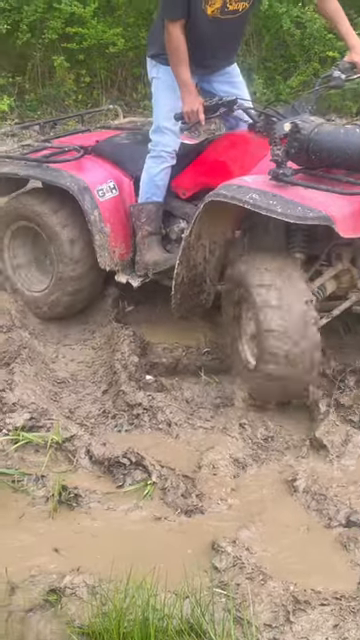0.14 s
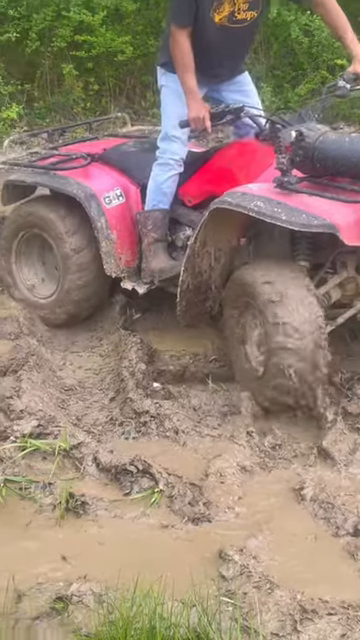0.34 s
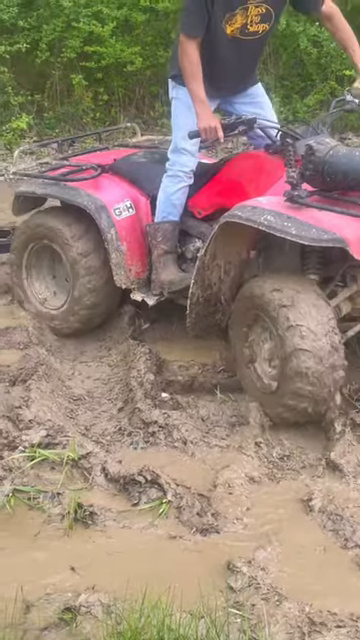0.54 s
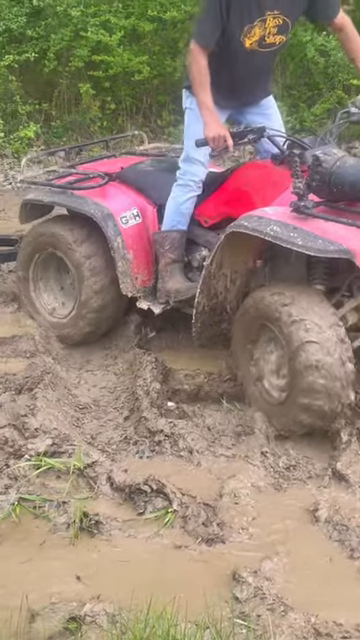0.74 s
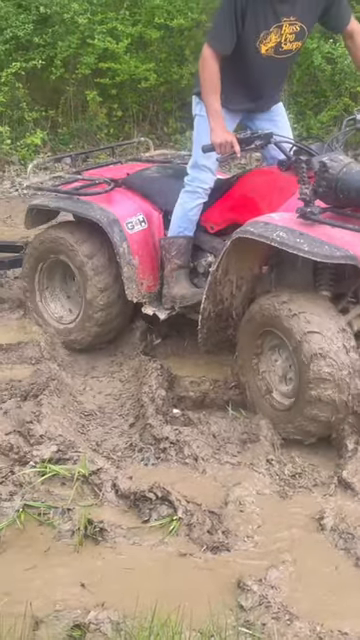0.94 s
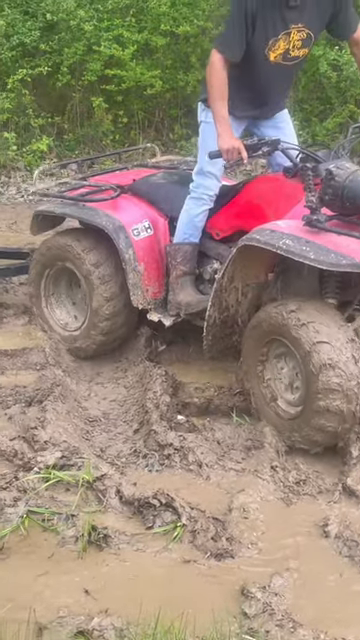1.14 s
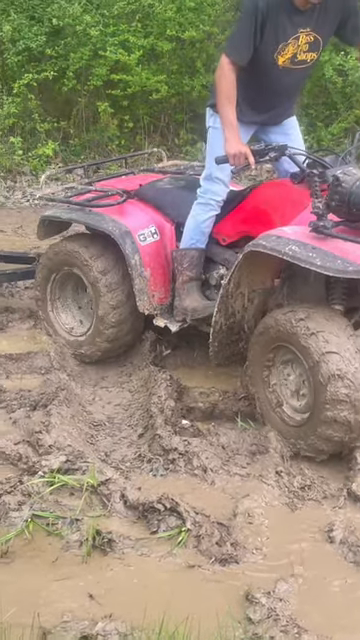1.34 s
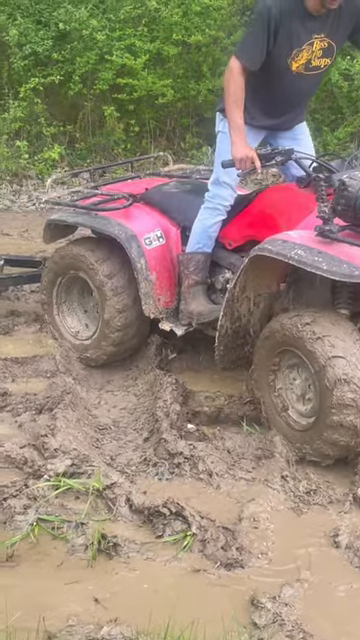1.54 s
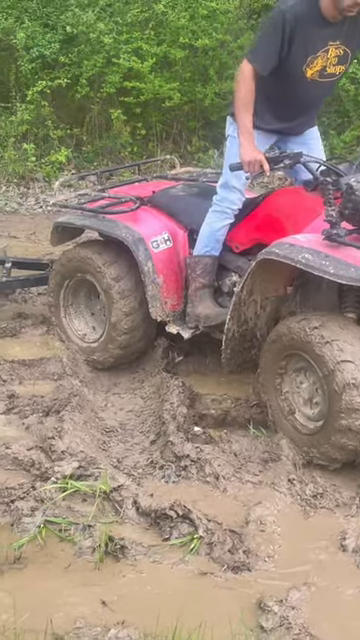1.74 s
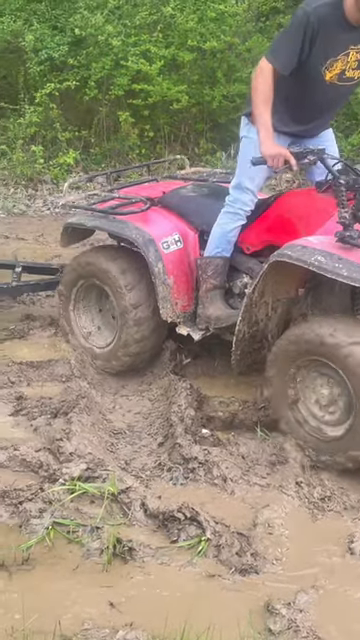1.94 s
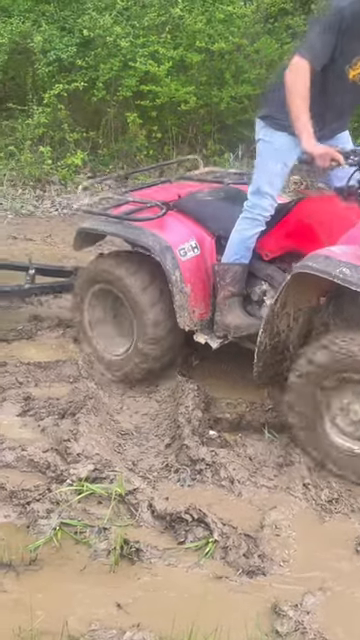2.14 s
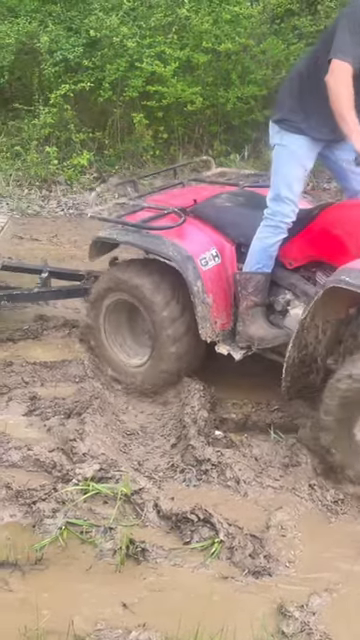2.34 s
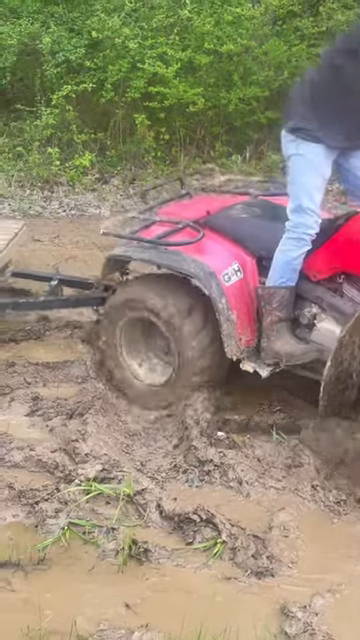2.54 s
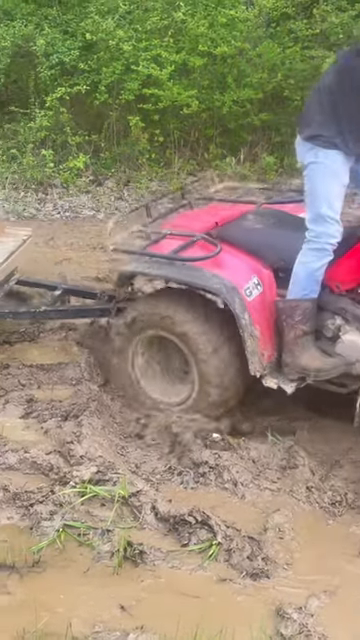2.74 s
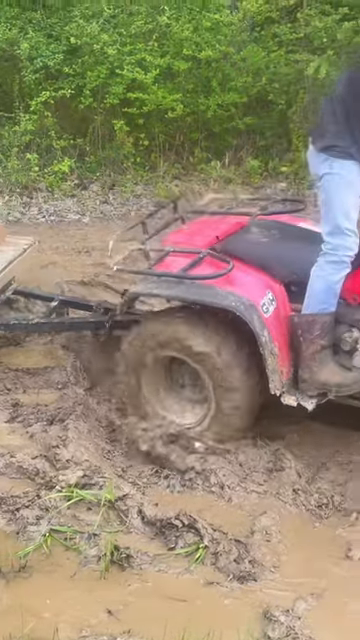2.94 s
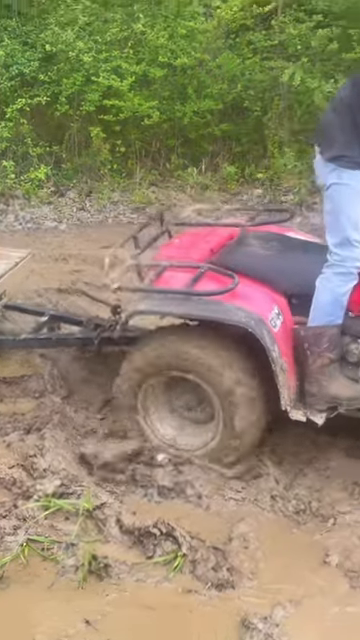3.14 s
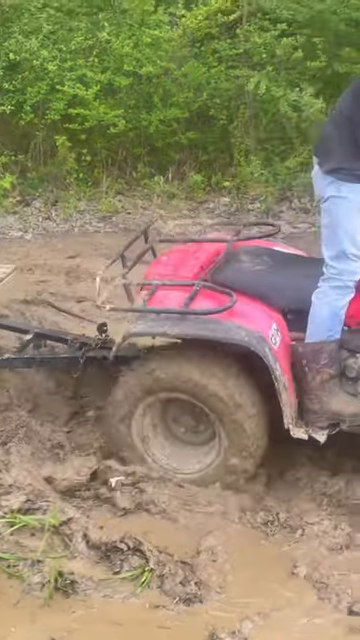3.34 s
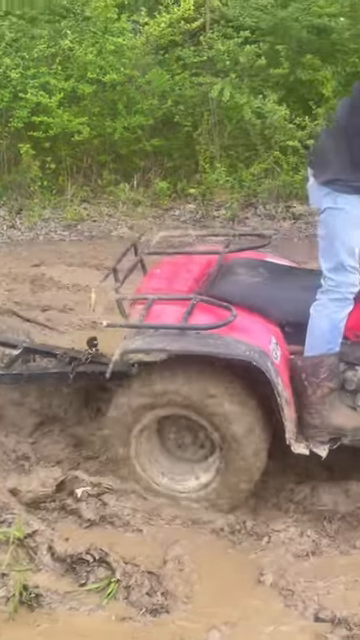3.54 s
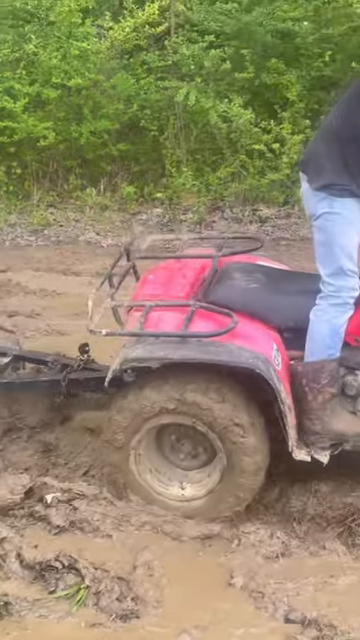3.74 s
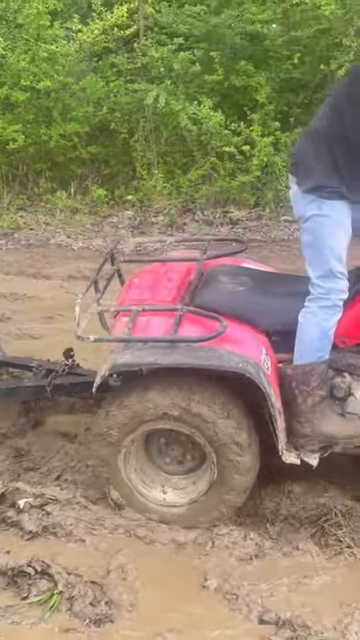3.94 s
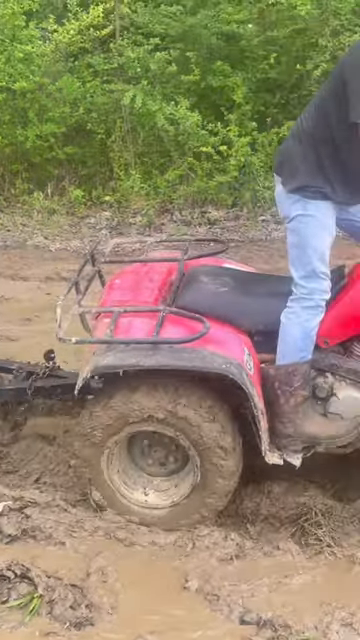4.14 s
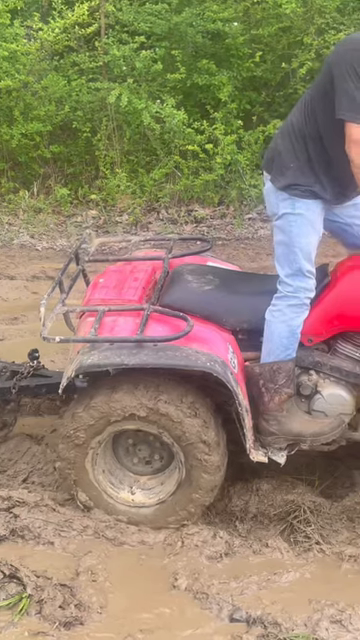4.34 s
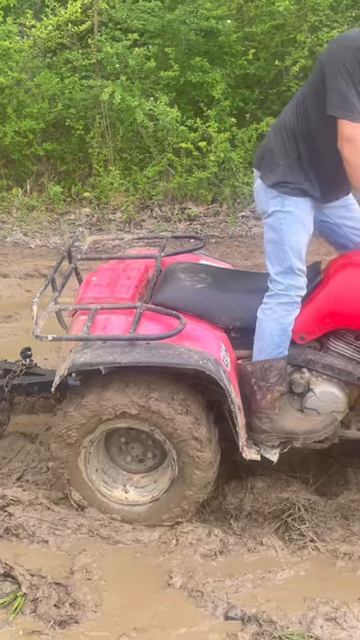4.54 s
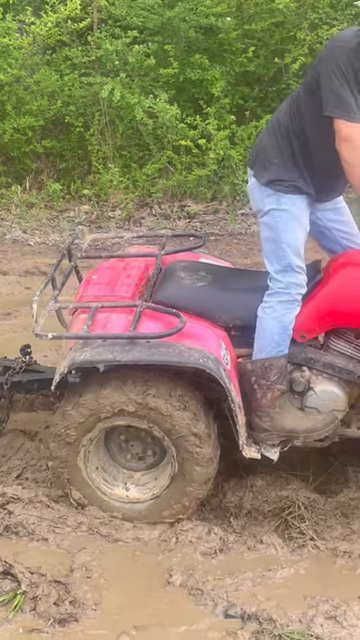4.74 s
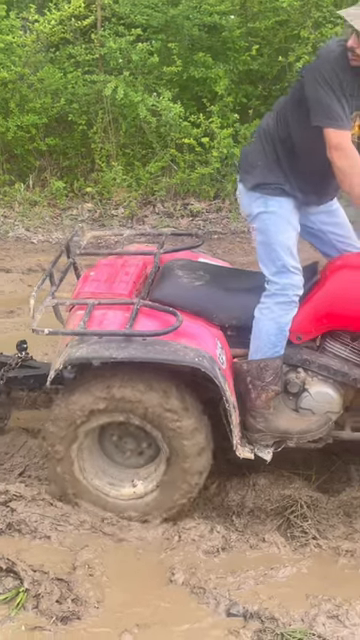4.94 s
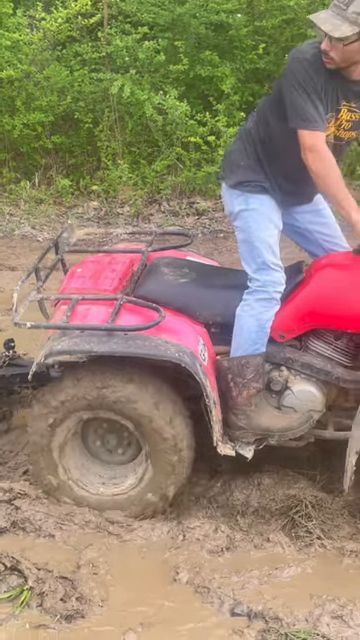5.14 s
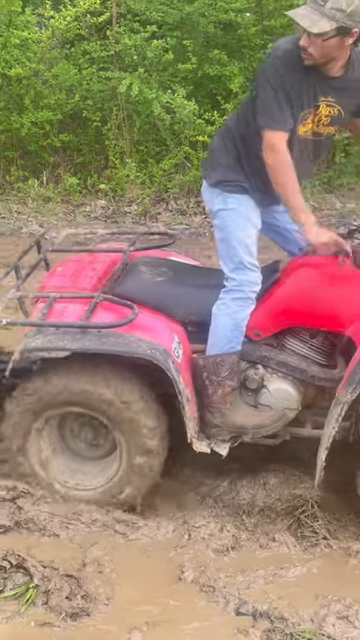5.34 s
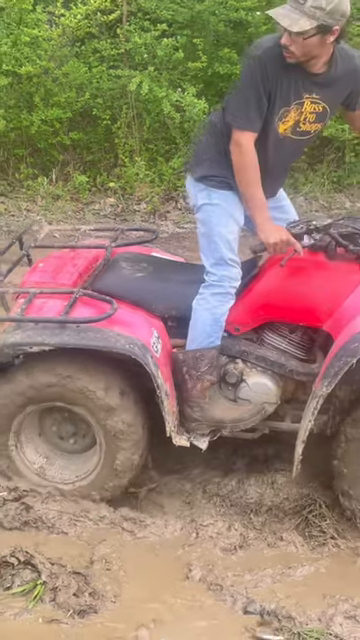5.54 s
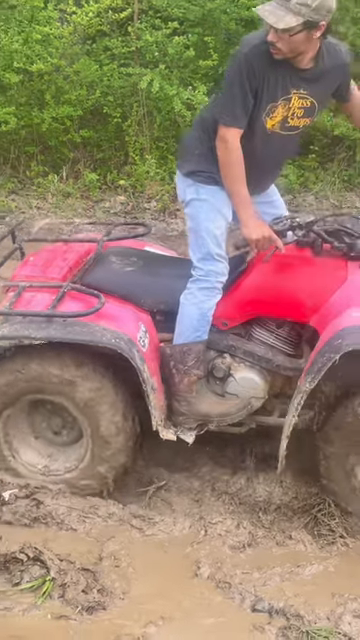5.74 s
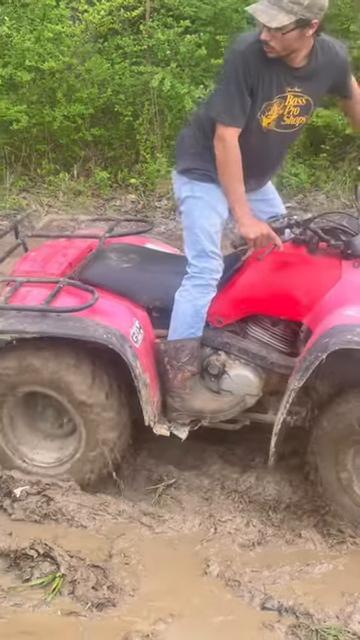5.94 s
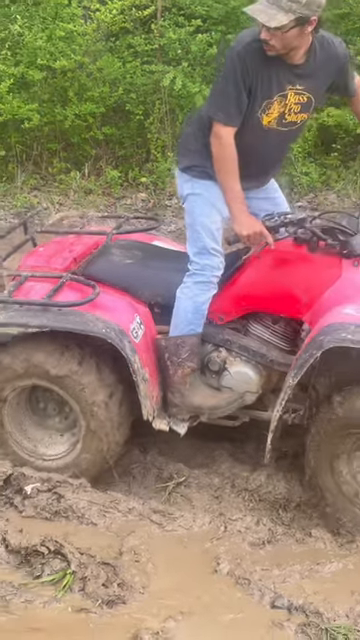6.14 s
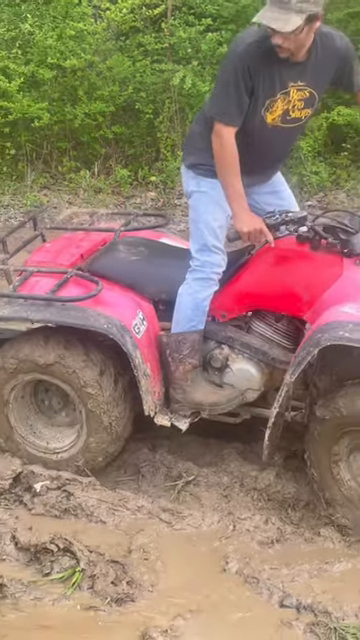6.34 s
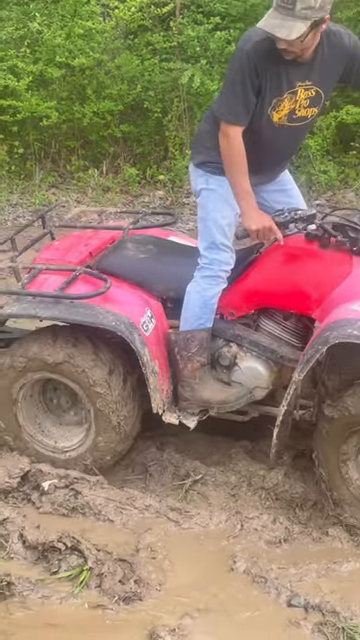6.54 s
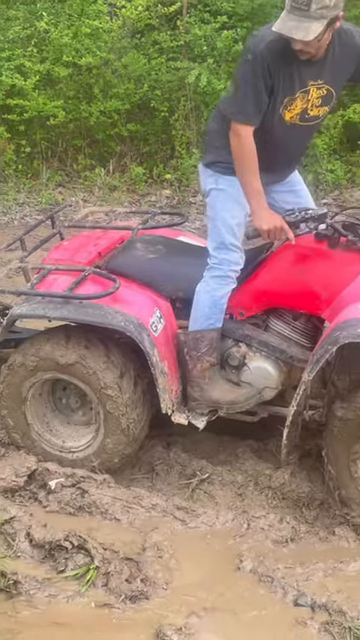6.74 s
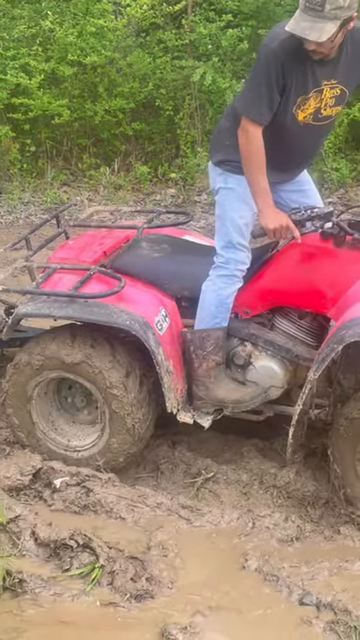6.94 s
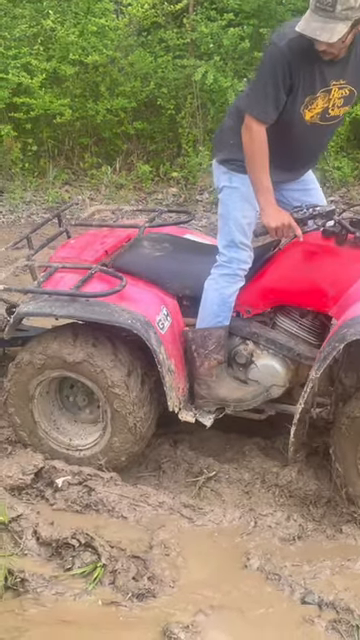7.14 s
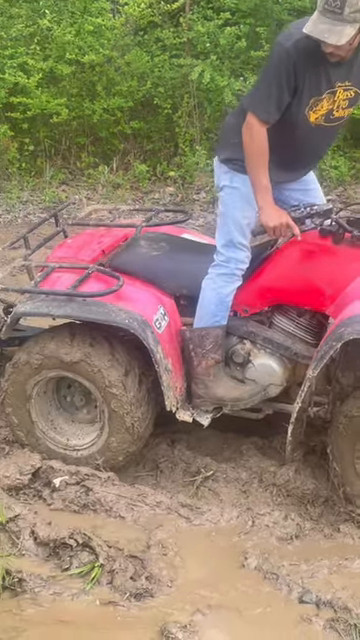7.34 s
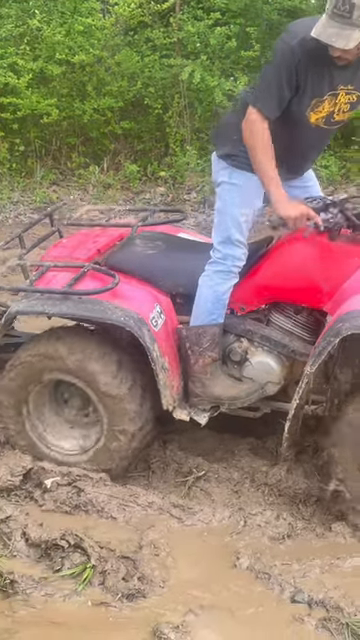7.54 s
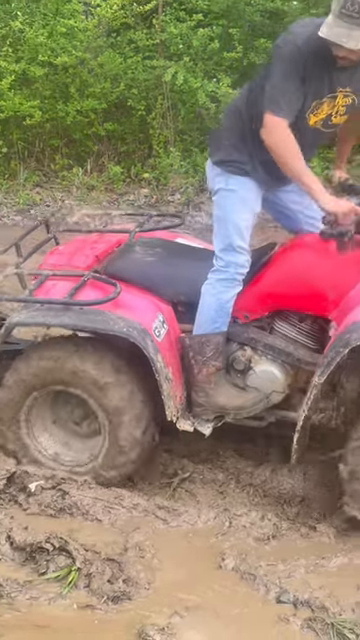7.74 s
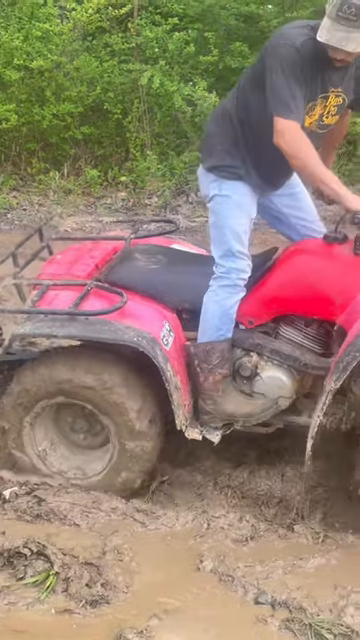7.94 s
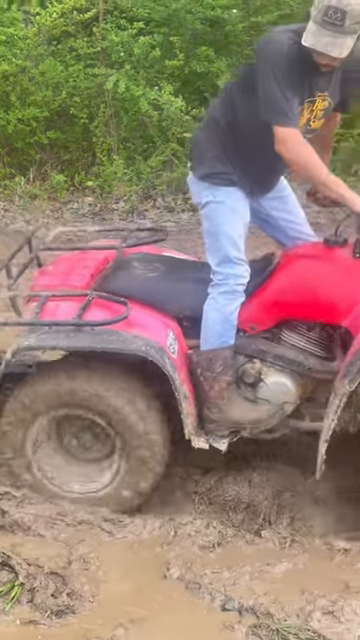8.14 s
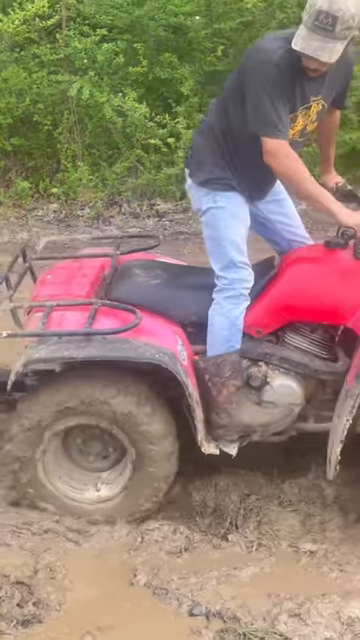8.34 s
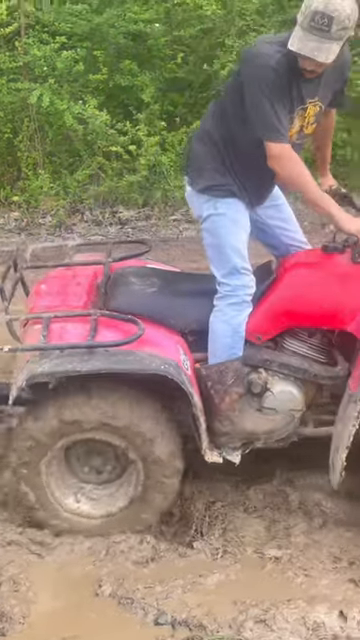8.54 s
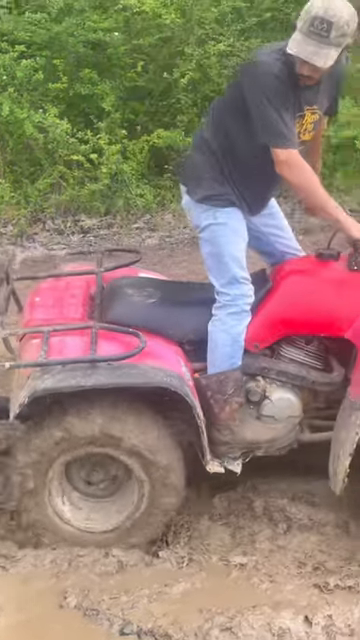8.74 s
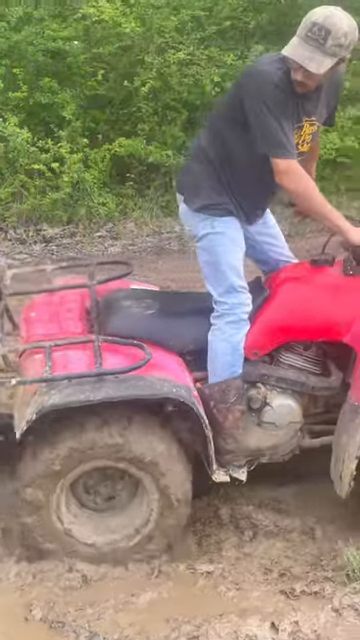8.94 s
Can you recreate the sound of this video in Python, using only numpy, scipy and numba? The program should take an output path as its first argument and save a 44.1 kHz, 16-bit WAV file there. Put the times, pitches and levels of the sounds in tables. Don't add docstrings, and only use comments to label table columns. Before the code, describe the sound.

A small four-stroke single-cylinder quad engine, close by outdoors. Two short throttle blips sag to a slow, soft putter, then a long booming pull with raspy exhaust, a drop to idle, a second pull that slackens to idle, and a last pull held to the end. Cases clatter, the intake gulps, and slack metal cracks as pulls begin. Phone microphone, dull and slightly saturated.

```python
import sys
import numpy as np
from scipy import signal
from scipy.fft import next_fast_len
from scipy.io import wavfile
from scipy.ndimage import uniform_filter1d
from numba import njit

SR = 44100
rng = np.random.default_rng(int(sys.argv[2]) if len(sys.argv) > 2 else 0)


def transcribe(u):
    v = np.clip(np.atleast_2d(u).T, -1, 1)
    q = np.round(v * 32767).astype(np.int16)
    wavfile.write(sys.argv[1], SR, q)


def makeup_ratio(level_db):
    decades = np.asarray(level_db, float) / 20
    return 10 ** decades


N = 400869

# time in seconds, firings per second.
ENGINE_SPEED = [
    [(-.02, 20.2), (.24, 19.76), (.35, 13.98), (.47, 16.45), (.54, 11.97), (.8, 19.76), (.93, 14.84),
     (1.23, 11.92), (1.62, 10.32)],
    [(1.83, 23.11), (2.29, 22.55), (2.62, 24.28), (3.15, 25.13), (3.77, 12.72), (4.25, 10.92), (4.6, 10.4)],
    [(4.87, 24.89), (5.05, 21.38), (5.46, 17.62), (5.92, 21.09), (6.47, 12.59), (6.77, 11.1), (7.16, 11.18)],
    [(7.37, 25.26), (7.71, 20.02), (7.9, 22.69), (8.07, 21.71), (8.65, 18.9), (8.88, 21.25), (9.1, 18.47)],
]
# snaps open, eases and shuts, all in seconds.
THROTTLE = [
    (-.1, .06, .06),
    (.61, .84, .84),
    (1.65, 1.9, 3.38),
    (4.63, 4.93, 6.14),
    (7.19, 7.46, 9.3),
]
# boom in dB when open, boom in dB at the idle after, gear in dB, nasal ring in dB.
PUSH_LEVELS = [
    (-12, -26, -4.5, -16.5),
    (-13, -24, -3, -18),
    (-12.5, -22.5, -0.87, -16),
    (-11, -22.5, -0.2, -23),
    (-11, -22, 0.44, -24),
]
# time in seconds, change of boom in dB.
STUMBLES = [(.085, -1), (.42, 2), (.485, 0.5), (.56, -2), (.86, 3), (.92, 2.5), (.99, 2), (1.06, 0),
            (3.69, -3.5), (3.51, -3.5), (1.136, -5), (1.3, -3), (3.4, -0.5), (3.45, 1), (3.77, 3),
            (3.85, 1), (3.93, -7.5), (4.37, 3), (6.16, 1.5), (6.29, 3.5), (6.36, 2), (6.43, 2), (6.51, -4),
            (6.675, -4)]
OPEN_LAWS = {"boom_db": (0.5, 0.39, 1), "boom_hz": (120.3, 3.32, -3.5), "bark_db": (-11, -0.53, 0),
             "rasp_db": (-15, 0.38, 0), "ring_db": (-17, 2, -0.5), "clatter_db": (-37, 0.95, 1.5),
             "hiss_db": (-48.5, .9, 2)}
SHUT_LAWS = {"boom_db": (0.5, 0.5), "boom_hz": (101, 1.4), "bark_db": (-10, .1), "rasp_db": (-16, .6),
             "ring_db": (-19.5, 1.8), "clatter_db": (-48.5, 1.23), "hiss_db": (-57.5, 0.84)}
# time in seconds, peak in dB, length in seconds.
GULPS = [(0.023, -36.5, 0.024), (0.475, -37, 0.028), (0.621, -37, 0.007), (1.085, -35.5, 0.011),
         (1.462, -39, 0.024), (1.639, -33, 0.011), (1.716, -22.5, 0.0073), (1.777, -34, 0.0069),
         (3.992, -37.5, 0.03), (4.626, -33.5, 0.02), (4.708, -26, 0.012), (4.766, -22.5, 0.004),
         (4.793, -32, 0.016), (4.858, -23.5, 0.0058), (4.895, -33.5, 0.015), (5.658, -27.5, 0.004),
         (6.516, -60, 0.013), (6.669, -37.5, 0.036), (7.1885, -26, 0.016), (7.262, -24, 0.0061),
         (7.31, -25, 0.0093), (7.85, -29.5, 0.013)]
# time in seconds, peak in dB.
TAKE_UPS = [
    (1.709, -34),
    (4.633, -38),
    (4.7, -29.5),
    (7.187, -31),
]
# centre in Hz, width in Hz, level in dB.
PIPE_MODES = [(400, 19, -3), (533.8, 40, 1.5), (611.7, 34, -3), (728, 160, 0), (802, 52, -3.5),
              (850, 32, -5), (903, 63, -3.5)]
# centre in Hz, width in Hz, level in dB.
CASE_MODES = [(1164, 510, 0), (1709, 171, -4), (1970, 384, -2), (2406, 260, -19)]
# centre in Hz, width in Hz, level in dB.
COVER_MODES = [(2730, 630, -1.5), (3400, 1100, -14.5), (3960, 580, -5), (4565, 120, -14.5),
               (4840, 220, -8.5), (5600, 1600, -16.5), (6350, 1200, -6), (7650, 5200, -13)]

PULL_SPEED, IDLE_SPEED = 21, 11
BARK_HZ, NASAL_HZ, NASAL_WIDTH_HZ = 306.8, 860, 153
HEADER_ECHO_S, SURGE_S = .0049, .0102


def unit(x):
    return x / np.sqrt(np.mean(x ** 2))


def noise():
    return rng.standard_normal(N)


def walk(rate):
    hold = int(SR / rate)
    steps = np.repeat(rng.standard_normal(N // hold + 1), hold)
    return 1.4 * uniform_filter1d(uniform_filter1d(steps, hold), hold)[:N]


def later(x, s):
    return np.roll(x, int(s * SR))


def struck(since, cycle, delay):
    return np.diff(1. * (since >= delay), prepend=1).clip(0) * np.sqrt(cycle)


@njit
def svf(x, hz, width):
    y, b, l = np.empty(len(x)), 0., 0.
    for i in range(len(x)):
        g, k = np.tan(np.pi * hz[i] / SR), width / hz[i]
        v = (b + g * (x[i] - l)) / (1 + g * (g + k))
        b, l, y[i] = 2 * v - b, l + 2 * g * v, k * v
    return y


def band(x, hz, width):
    peak = signal.iirpeak(hz, hz / width, fs=SR)
    return signal.lfilter(*peak, signal.lfilter(*peak, x))


def body(x, modes):
    return sum((-1) ** m * makeup_ratio(db) * band(x, hz, width) / np.sqrt(width)
               for m, (hz, width, db) in enumerate(modes))


def laws(t, speed):
    opens, eases, shuts = np.transpose(THROTTLE)
    push = np.clip(np.searchsorted(opens, t) - 1, 0, None)
    wide, snap = t < shuts[push], t < eases[push]
    out = {}
    for name, (base, slope, extra) in OPEN_LAWS.items():
        shut_base, shut_slope = SHUT_LAWS[name]
        pulling = base + slope * (speed - PULL_SPEED) + extra * snap
        out[name] = np.where(wide, pulling, shut_base + shut_slope * (speed - IDLE_SPEED))
    open_db, idle_db, gear_db, nasal_db = np.transpose(PUSH_LEVELS)[:, push]
    out["boom_db"] = out["boom_db"] + np.where(wide, open_db, idle_db)
    out["nasal_db"] = nasal_db - 6.5 * np.minimum(t - opens[push], 1.5)
    out["overrun"] = np.where(wide, 0, speed - IDLE_SPEED)
    out["wide"] = np.where(wide, 1, .4)
    out["ring_db"] = np.minimum(out["ring_db"], -5)
    out["clatter_db"] = out["clatter_db"] + gear_db
    out["hiss_db"] = out["hiss_db"] + gear_db
    return out


def crank():
    step_s = .002
    t = np.arange(-.02, 9.2, step_s)
    turns = -.15 + np.cumsum(np.interp(t, *np.concatenate(ENGINE_SPEED).T)) * step_s
    opens = np.interp(np.arange(int(turns[-1])), turns, t)
    cycle = np.diff(opens, append=2 * opens[-1] - opens[-2])
    now = np.arange(N) / SR
    firing = np.clip(np.searchsorted(opens, now, "right") - 1, 0, None)
    controls = laws(opens, 1 / cycle)
    controls["stumble"] = sum(db * (np.abs(opens - s) < .02) for s, db in STUMBLES)
    controls["boom_db"] = controls["boom_db"] + controls["stumble"]
    held = {name: values[firing] for name, values in controls.items()}
    return firing, now - opens[firing], cycle[firing], held


def wash(loud):
    effort = np.sqrt(uniform_filter1d(loud ** 2, size=6000) + 1e-9)
    dull = makeup_ratio(-25.5) * unit(band(noise(), 230, 340)) + makeup_ratio(-27) * unit(band(noise(), 900, 600))
    rumble = makeup_ratio(-45.0) * unit(band(noise(), 77, 30)) * makeup_ratio(6.1 * walk(4.7))
    return effort * dull + rumble


def take_up():
    t = np.arange(N) / SR
    burst = sum(makeup_ratio(db) * (t > s) * np.exp(-np.abs(t - s) / 0.009) for s, db in TAKE_UPS)
    return unit(band(noise(), 2540, 1500)) * burst


def intake():
    t = np.arange(N) / SR
    rise_s = 0.0014
    return sum(makeup_ratio(db) * np.clip((t - s) / rise_s, 0, 1) * np.exp(-np.abs(t - s) / np.clip(long_s, .003, .03))
               for s, db, long_s in GULPS)


def gear(since, cycle):
    intake_lead_s = 0.04
    law = laws(np.arange(N) / SR + intake_lead_s, 1 / cycle)
    clatter_db, hiss_db = (uniform_filter1d(law[name], size=3000) for name in ("clatter_db", "hiss_db"))
    angle = since / cycle
    intake_shut = np.where(angle > .7, np.exp(-(angle - .7) / 0.29), 0)
    ticks_db = 2.5 * rng.exponential(size=N).clip(0, 3) * (rng.random(N) < .01)
    gate = (0.43 + 1.086 * np.exp(-angle / 0.3) + 0.72 * intake_shut) * makeup_ratio(ticks_db + walk(60))
    gulp = intake()
    clatter = gate * makeup_ratio(clatter_db + 5.5) + makeup_ratio(2.5) * gulp
    hiss = gate * makeup_ratio(hiss_db + 4.5) + makeup_ratio(-8) * gulp
    turns = uniform_filter1d(1 / cycle, size=4000)
    whine = unit(band(noise(), 4500, 130)) * makeup_ratio(-57 + 5 * np.minimum(turns - 24.5, 0))
    common = noise()
    ports = []
    for lag_s in (0, .00005):
        cases = body(clatter * (later(common, lag_s) + 0.83 * noise()), CASE_MODES)
        covers = body(hiss * (later(common, 1.4 * lag_s) + 0.9 * noise()), COVER_MODES)
        ports.append(whine + makeup_ratio(34.0) * cases + makeup_ratio(36.5) * covers)
    return ports


def nasal_panel(crack, jets, load, heat, damp, nasal_db):
    blows = crack * (.5 + .5 * load) + .8 * load * later(crack, .0125) + .014 * (1 - .85 * load) * jets
    hz = NASAL_HZ * np.maximum(heat, 1.03)
    high = unit(svf(svf(blows, hz, NASAL_WIDTH_HZ), hz, NASAL_WIDTH_HZ) * damp)
    low = unit(band(blows, 384.6, 60) * damp)
    return (high + makeup_ratio(-0.5) * low) * makeup_ratio(nasal_db)


def pipe_rasp(echoes, jets, load, heat, damp, chance):
    unsteady = 1 - .85 * load
    cracks = echoes * (.45 + .55 * load) * makeup_ratio(3 * unsteady * chance)
    drive = unit(cracks) + (.14 + .3 * unsteady) * unit(jets)
    rasp = 0
    for m, (hz, width, db) in enumerate(PIPE_MODES):
        mode = svf(svf(drive, hz * heat, 1. * width), hz * heat, 0.75 * width)
        rasp = rasp + (-1) ** m * makeup_ratio(db) * mode / np.sqrt(width)
    return unit(rasp * damp)


def valve_bark(blows, swell, load, heat, detune):
    knock = svf(svf(blows, BARK_HZ * heat, 59.0), BARK_HZ * heat * (1 + detune), 62.0)
    rough = (0.48 + 0.77 * (1 - .85 * load)) * unit(band(noise(), 276, 160)) * swell
    return makeup_ratio(-4) * (unit(knock) + rough)


def gas_puff(shove):
    return unit(band(shove, 62, 29)) + 2.15 * unit(band(later(shove.clip(0), 0.0078), 152.5, 51))


def silencer_boom(hz, late, swell, load):
    turn = 2 * np.pi * hz * late * (1 + late * (0.37 * load - 1.5))
    turn = turn + .25 * (1 - .85 * load) * walk(60)
    tone = np.cos(turn) + (.07 + 0.074 * load) * np.cos(2 * turn + 1.4)
    return (1.044 + 0.55 * load) * swell * tone


def exhaust(firing, since, cycle, c):
    boom_db = c["boom_db"]
    hz = np.clip(c["boom_hz"], 90, 140)
    load = c["wide"] * np.clip((boom_db + 26) / 6, 0, 1)
    unsteady = 1 - .85 * load
    chance = rng.standard_normal((firing[-1] + 1, 3))[firing].T
    open_share = .51 + 0.054 * (1 - load)
    stroke = np.clip(since / (open_share * cycle), 0, 1)
    skew = 1.05 - 0.2 * load - 0.23 * c["stumble"].clip(None, 0)
    swell = np.sin(np.pi * stroke ** skew).clip(0) ** (0.62 + 0.53 * load)
    swell = swell * makeup_ratio(1.2 * unsteady * walk(90))
    crest_s = 0.01213
    boom = silencer_boom(hz, since - crest_s, swell, load) * makeup_ratio(boom_db)
    ring = svf(boom, 1.106 * hz, 7.9) * makeup_ratio(c["ring_db"] + 9.5)
    shove = np.diff(1. * (stroke < 1), prepend=0) * np.sqrt(cycle)
    puff = gas_puff(shove) * makeup_ratio(boom_db - 15.5 - 11.0 * load + 0.63 * c["overrun"])
    crack = np.diff(firing, prepend=0) * np.sqrt(cycle)
    speed = (.047 / cycle) ** load
    heat = uniform_filter1d(speed ** .6 * (1.04 - .04 * load), size=400)
    scatter = unsteady * chance * [[1.2], [.02], [1.5]]
    blows = (1.05 - 0.83 * load) * crack + 0.72 * load * later(crack, SURGE_S) + 0.13 * shove.clip(None, 0)
    blows = blows + 0.65 * (1 - load) * struck(since, cycle, 0.34 * cycle) * makeup_ratio(3 * chance[2])
    bark = valve_bark(blows * makeup_ratio(scatter[0]), swell, load, heat, scatter[1]) * makeup_ratio(boom_db + c["bark_db"])
    echoes = crack
    for trips, gain in ((1, 0.29), (2, 0.38 * load), (4, 0.15 * load)):
        echoes = echoes + gain * struck(since, cycle, trips * HEADER_ECHO_S / speed)
    jets = (np.exp(-since / 0.018) + 0.45 + 0.51 * (1 - load) * swell) * noise()
    damp = uniform_filter1d(np.where(stroke < .95, 1, .45), size=150)
    rasp = pipe_rasp(echoes, jets, load, heat, damp, chance[1])
    rasp = rasp * makeup_ratio(boom_db + c["rasp_db"] - 7.5 + scatter[2])
    nasal = nasal_panel(crack, jets, load, heat, damp, boom_db + c["nasal_db"])
    return nasal + boom + ring + puff + bark + rasp


def scene():
    firing, since, cycle, controls = crank()
    pipe = exhaust(firing, since, cycle, controls)
    left, right = gear(since, cycle)
    low = pipe + wash(pipe) + take_up()
    bass = signal.sosfilt(signal.butter(1, 900, fs=SR, output="sos"), low)
    side = makeup_ratio(-4) * band(low, 678, 250) + makeup_ratio(-18.0) * band(low, 380, 200)
    side = side - makeup_ratio(-15.0) * np.imag(signal.hilbert(bass, next_fast_len(N + SR))[:N])
    return np.array([1.224 * low + side + makeup_ratio(3.93) * left, 1.15 * low - side + makeup_ratio(5.13) * right])


def roll_off(x):
    return signal.sosfilt(signal.butter(12, 12300, fs=SR, output="sos"), x)


def record(dry):
    x = signal.sosfilt(signal.butter(2, 42, "high", fs=SR, output="sos"), dry)
    x = np.tanh(0.69 * x) / 0.74
    x = signal.sosfilt(signal.butter(12, 7700, fs=SR, output="sos"), x)
    x = x * (1 + makeup_ratio(-64.5) * np.cos(2 * np.pi * 12000 * np.arange(N) / SR))
    x = x * np.clip((N - np.arange(N)) / 130, 0, 1)
    return roll_off(x)


dry = scene()
out = record(dry)
transcribe(out)
```